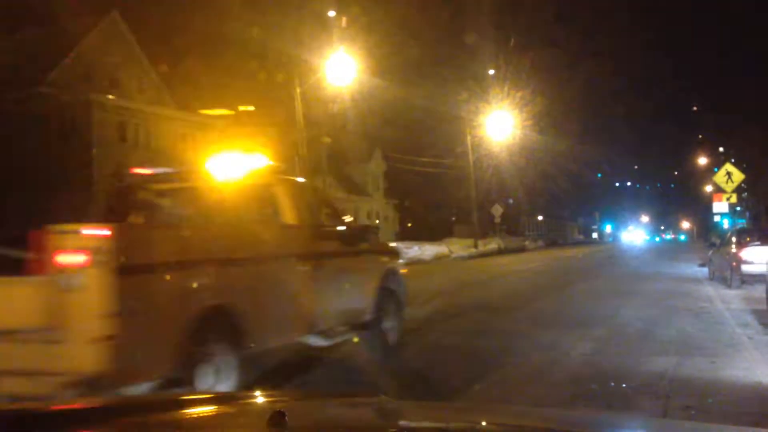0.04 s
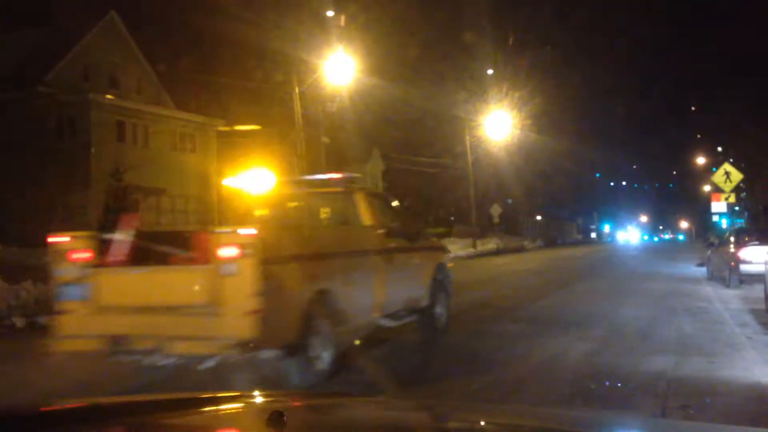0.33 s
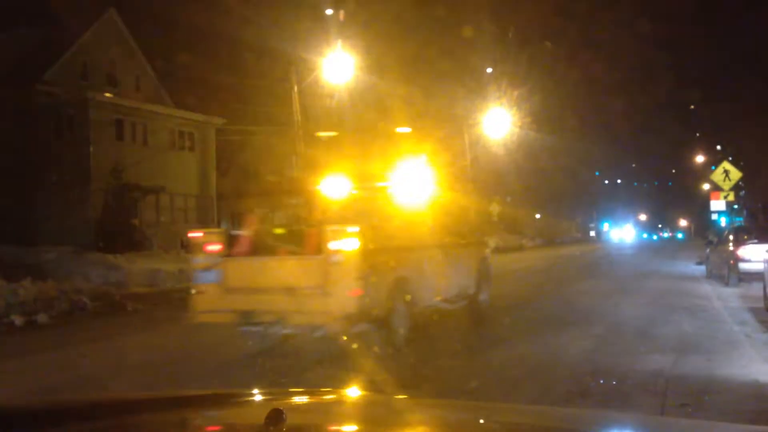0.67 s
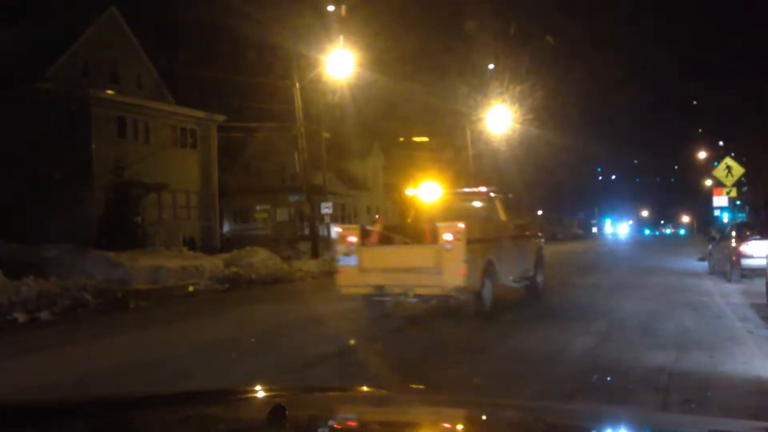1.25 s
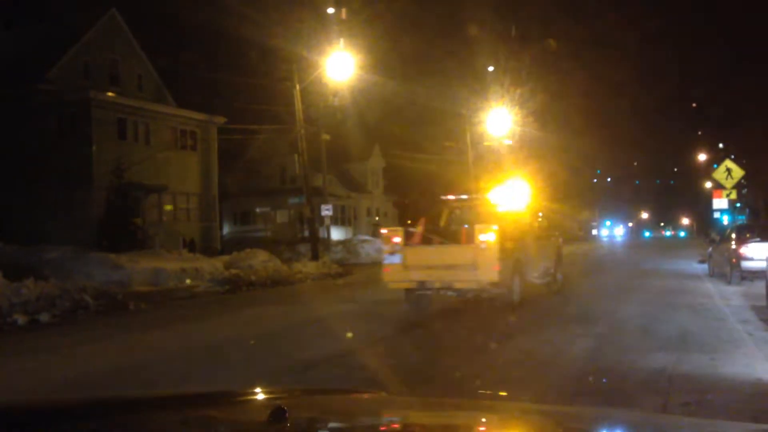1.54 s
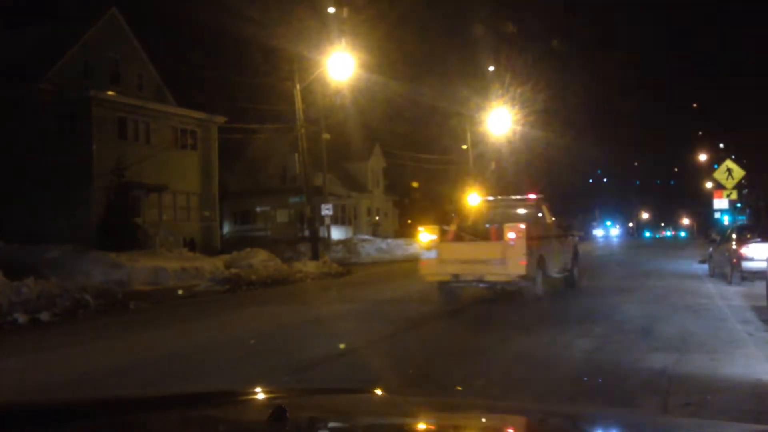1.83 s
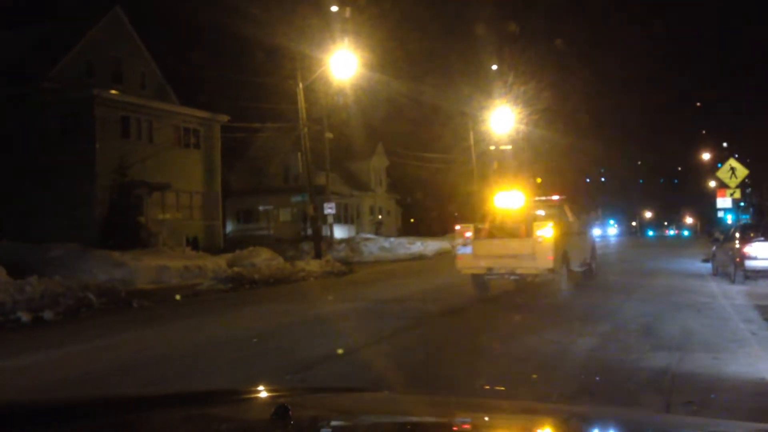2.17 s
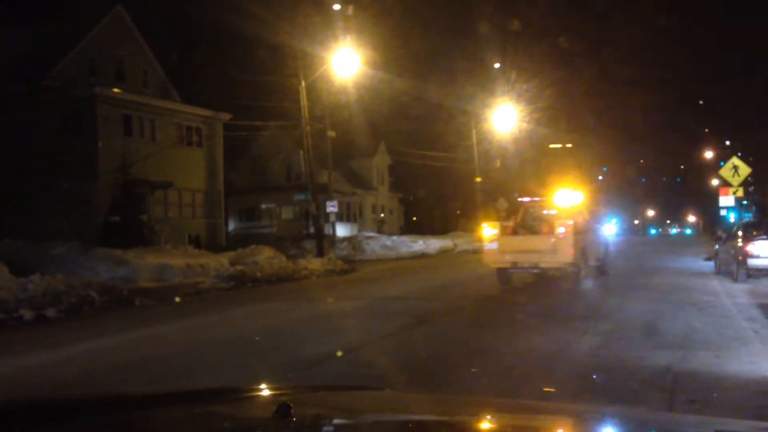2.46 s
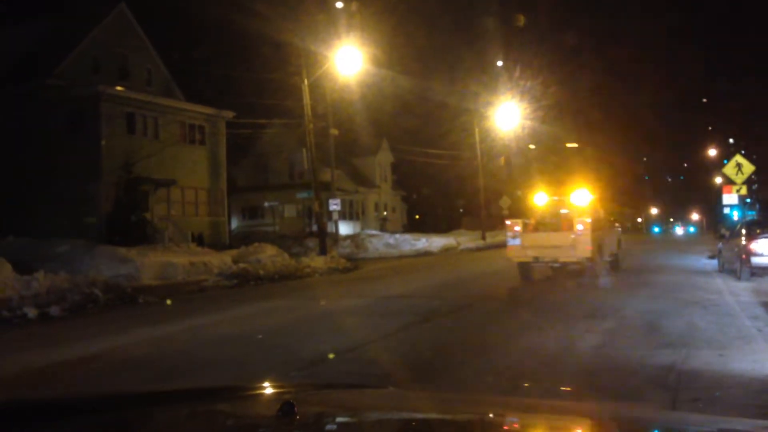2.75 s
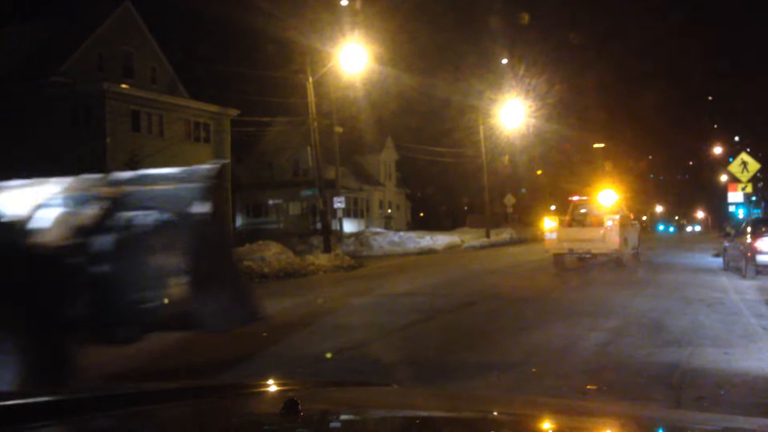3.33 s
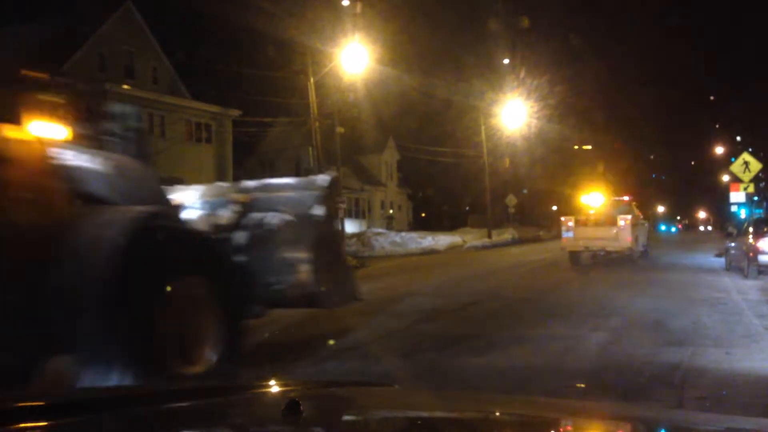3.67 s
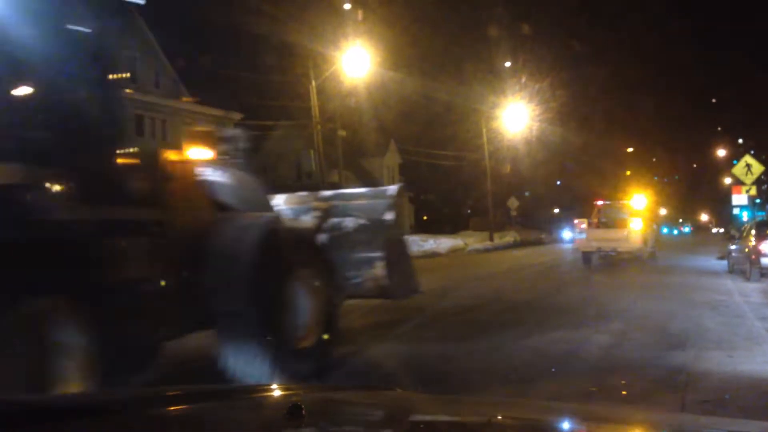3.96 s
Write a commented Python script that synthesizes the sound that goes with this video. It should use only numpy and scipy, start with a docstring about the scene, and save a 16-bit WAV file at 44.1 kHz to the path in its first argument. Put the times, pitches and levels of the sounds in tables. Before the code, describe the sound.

A heavy wheel loader's exhaust drones throughout, heard inside a closed waiting car over an uneven low rumble, muffled street noise and a steady cabin fan. Dull thumps come here and there, and the trim knocks lightly at about 1.2 and 2.5 seconds. From around 3 seconds diesel clatter and a thin gear whine rise as the loader draws alongside, its big tyres booming briefly near 3.8 seconds.

```python
"""A night street, heard from inside a waiting car: a heavy wheel loader draws alongside.
Its exhaust drones through the closed cabin over a low rumble with a few dull thumps. Its diesel
clatter and gear whine rise as it comes near, and its big tyres boom as they roll past.
The car body muffles the road noise, the cabin fan blows steadily and the trim knocks twice."""
import sys
import numpy as np
from scipy.fft import rfft, irfft, next_fast_len
from scipy.io import wavfile
from scipy.ndimage import map_coordinates

SR = 44100
rng = np.random.default_rng(int(sys.argv[2]) if len(sys.argv) > 2 else 0)


def digitize_waveform(pressure):
    """Quantize a signal to 16-bit integers and store it at the path in sys.argv[1].

    Rows of a 2-D input are taken as channels; values are limited to [-1, 1].
    """
    field = np.atleast_2d(pressure).T
    bounded = np.clip(field, -1, 1)
    quanta = np.round(bounded * 32767).astype(np.int16)
    wavfile.write(sys.argv[1], SR, quanta)


N = 176400


def amp(db):
    """Decibels to gain."""
    return 10 ** (np.asarray(db) / 20)


def unit(x):
    """Scale to rms 1."""
    return x / np.sqrt(np.mean(x ** 2) + 1e-20)


def clock():
    """Time of each sample in seconds."""
    return np.arange(N) / SR


def curve(rows):
    """(s, value) points joined by straight lines."""
    return np.interp(clock(), *np.transpose(rows))


def wobble(rate):
    """A smooth random curve, rate knots a second."""
    return map_coordinates(rng.standard_normal(1024), [clock() * rate], mode="mirror")


def filtered(x, response):
    """x times a response of frequency."""
    m = next_fast_len(N + SR // 2)
    return irfft(rfft(x, m) * response(np.fft.rfftfreq(m, 1 / SR)), m)[:N]


def noise(spectrum):
    """Noise of rms 1 coloured by (Hz, dB) points."""
    f, db = np.transpose(spectrum)
    white = rng.standard_normal(N)
    return unit(filtered(white, lambda hz: amp(np.interp(np.log(hz + 1), np.log(f + 1), db))))


def tone(phase):
    """A sine of rms 1 with a random starting phase."""
    return np.sqrt(2) * np.sin(phase + 2 * np.pi * rng.random())


# The swells of the exhaust drone. Each row: time in seconds, level in dB.
DRONE_LEVEL = [(0, -35.5), (.33, -40), (.45, -33), (.7, -36), (.9, -36), (1.0, -33.5), (1.17, -36),
               (1.36, -30.5), (1.55, -33), (1.7, -32.5), (2.2, -35), (2.6, -28.5), (2.72, -30.5),
               (3.02, -37), (3.15, -31), (3.38, -32.5), (3.6, -26.5), (3.82, -28), (4, -32.5)]
# Its faint overtones. Each row: multiple of the firing rate, level in dB against the note.
DRONE_OVERTONES = [(2, -28), (3, -40)]


def exhaust(firing_phase):
    """The engine's firing note drones in the cabin, nearly a pure tone."""
    note = tone(firing_phase)
    overtones = sum(amp(db) * tone(k * firing_phase + wobble(11)) for k, db in DRONE_OVERTONES)
    waver_db = 0.57 * wobble(25.08)
    return (note + overtones) * amp(curve(DRONE_LEVEL) + waver_db)


# The rumble's deep colour. Each row: frequency in Hz, relative level in dB.
RUMBLE_SPECTRUM = [(15, -27), (25, -14.5), (38, -8), (52, 1), (77, -0.5), (90, 1.5), (110, 0), (128, 5),
                   (145, -15.5), (220, -38), (500, -85)]
# Its surges and dips. Each row: time in seconds, level in dB.
RUMBLE_LEVEL = [(0, -39), (.25, -52), (.5, -42.5), (.95, -45.5), (1.25, -44.5), (1.47, -40.5),
                (1.62, -43.5), (2.0, -39), (2.17, -58), (2.32, -42), (3.0, -45), (3.1, -36.5), (3.22, -41),
                (3.42, -43.5), (3.75, -39.5), (4, -43)]


def rumble():
    """A bed of low noise that heaves unevenly."""
    return noise(RUMBLE_SPECTRUM) * amp(curve(RUMBLE_LEVEL))


# The dull wash of the road. Each row: frequency in Hz, relative level in dB.
ROAD_SPECTRUM = [(100, -14), (145, 1), (160, -1), (205, 1.5), (228, -5), (248, -9.5), (300, -4.5),
                 (400, -8.5), (500, -11), (620, -20.5), (900, -46.5)]


def road(nearness):
    """Street noise muffled by the car body, lifting a little as the loader nears."""
    level_db = -45.5 + 1.66 * nearness + 0.33 * wobble(10)
    return noise(ROAD_SPECTRUM) * amp(level_db)


# The hollow rush of the vents. Each row: frequency in Hz, relative level in dB.
FAN_SPECTRUM = [(250, -17), (500, -6.5), (620, -8), (740, 4), (800, 1.5), (860, -2), (930, -0.5),
                (1120, -6), (1400, -5), (1550, -8.5), (1700, -15), (2000, -18.5), (2300, -20), (2500, -10),
                (2720, -5.5), (2900, -12.5), (3150, -12.5), (3400, -17), (4000, -25), (5500, -40),
                (9000, -58)]
# A nearly flat hiss. Each row: frequency in Hz, relative level in dB.
HISS_SPECTRUM = [(100, -3.5), (4000, 2), (8000, -0.9), (15000, -3.5)]


def fan():
    """Air blows through the dashboard vents, over a faint even hiss."""
    air = noise(FAN_SPECTRUM) * amp(-54 + 0.61 * wobble(18))
    return air + noise(HISS_SPECTRUM) * amp(-72.5)


# The diesel's midrange clatter. Each row: frequency in Hz, relative level in dB.
CLATTER_SPECTRUM = [(300, -16), (600, 12.5), (780, 5.5), (1000, -0.5), (1400, 1), (1850, -2), (2250, 1),
                    (2800, 5), (3150, 1), (3400, -7), (3700, -4.5), (4100, -21), (5000, -25), (8000, -38.5),
                    (15000, -40)]
# Bright rasp from the engine bay. Each row: frequency in Hz, relative level in dB.
RASP_SPECTRUM = [(1000, -30), (1700, -2), (2200, -6), (2800, -3.5), (3150, 6), (3400, -4), (3700, -9.5),
                 (4100, -11), (5000, -24), (9000, -45)]


def diesel(firing_phase, nearness):
    """Engine noise pulses with the firings: clatter grows on approach, rasp opens up only alongside."""
    clatter = noise(CLATTER_SPECTRUM) * amp(-53) * nearness
    rasp = noise(RASP_SPECTRUM) * amp(-60.5) * nearness ** 3.2
    pulsing = 1 + 0.097 * np.cos(firing_phase)
    flutter = amp(0.36 * wobble(18))
    return (clatter + rasp) * pulsing * flutter


# The whine's thin tones. Each row: multiple of the firing rate, level in dB when closest.
WHINE_PARTIALS = [(7, -63), (11.05, -69), (14, -67.5), (19, -69), (20.02, -69.5), (24.24, -68.5),
                  (26.04, -67), (27.34, -69.5)]


def gear_whine(firing_phase, nearness):
    """Wavering engine and gear tones follow the engine speed, heard mostly from alongside."""
    whine = np.zeros(N)
    for multiple, db in WHINE_PARTIALS:
        gain = amp(db + 0.88 * wobble(8.7))
        whine += gain * tone(multiple * firing_phase + 0.27 * wobble(33))
    return whine * nearness ** 1.2


# Dull thumps in the rumble. Each row: start in seconds, pitch in Hz, peak level in dB.
THUMPS = [(.15, 114.2, -31), (1.44, 76.55, -32), (1.822, 82.9, -37.5), (2.265, 79.1, -36.5),
          (3.05, 107, -38), (3.16, 70, -45), (3.746, 81, -34.5), (3.975, 89.8, -32)]


def thumps(rise_s=0.016):
    """Each jolt is a low tone that swells and dies within a few cycles."""
    out = np.zeros(N)
    for start, hz, db in THUMPS:
        age = np.maximum(clock() - start, 0)
        envelope = age / rise_s * np.exp(1 - age / rise_s)
        out += amp(db) * envelope * np.sin(2 * np.pi * hz * age)
    return out


# Light knocks in the cabin. Each row: start in seconds, level in dB.
KNOCKS = [(1.154, -43), (2.537, -41)]
# The trim's ring. Each row: pitch in Hz, level in dB against the knock, seconds to fade by 60 dB.
TRIM_MODES = [(518, 2.5, 0.04), (656, -2, 0.054), (897, -7, 0.049), (1225, -9.5, 0.089), (2690, -11.5, .03)]


def trim_knocks():
    """Each knock rings a few short modes of the cabin trim."""
    out = np.zeros(N)
    for start, knock_db in KNOCKS:
        age = np.maximum(clock() - start, 0)
        for hz, mode_db, t60 in TRIM_MODES:
            out += amp(knock_db + mode_db - 60 * age / t60) * np.sin(2 * np.pi * hz * age)
    return out


def tyre_boom(pitch_hz=54.3, peak_s=3.77, half_width_s=0.21):
    """The big tyres roll past in one short, deep swell."""
    t = clock()
    boom = tone(2 * np.pi * pitch_hz * t + 0.24 * wobble(12))
    swell = 1 / (1 + ((t - peak_s) / half_width_s) ** 4)
    return amp(-44) * boom * swell


# The engine speed, sagging slightly. Each row: time in seconds, firing rate in Hz.
FIRING_RATE = [(0, 117.8), (.35, 117.2), (.85, 116.4), (1.1, 114.9), (1.5, 114.2), (2.8, 113.8),
               (3.4, 114.1), (4, 113.9)]


def scene(closest_s=3.87, passing_s=0.35):
    """The mono cabin mix: one engine speed drives the drone, clatter and whine."""
    firing_phase = 2 * np.pi * np.cumsum(curve(FIRING_RATE)) / SR
    # Nearness falls as one over distance; passing_s is the closest distance over the speed.
    nearness = passing_s / np.hypot(passing_s, clock() - closest_s)
    bed = exhaust(firing_phase) + rumble() + road(nearness) + fan()
    approach = diesel(firing_phase, nearness) + gear_whine(firing_phase, nearness)
    return (bed + approach + thumps() + trim_knocks() + tyre_boom())[None]


def record(dry):
    """The very top of the treble is cut away."""
    return filtered(dry[0], lambda hz: hz < 15400)[None]


dry = scene()
out = record(dry)
digitize_waveform(out)
```